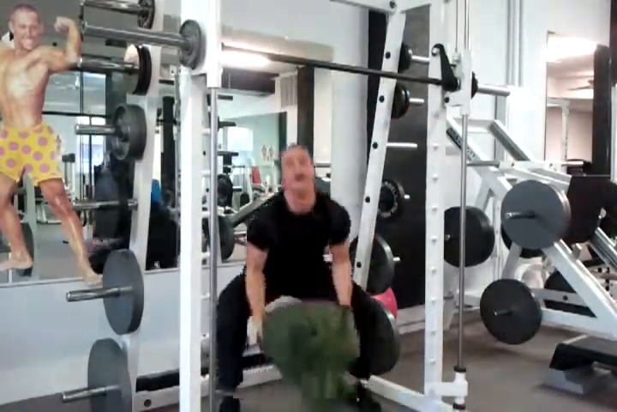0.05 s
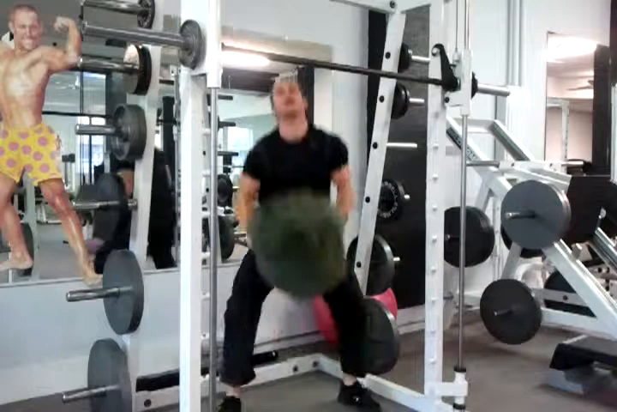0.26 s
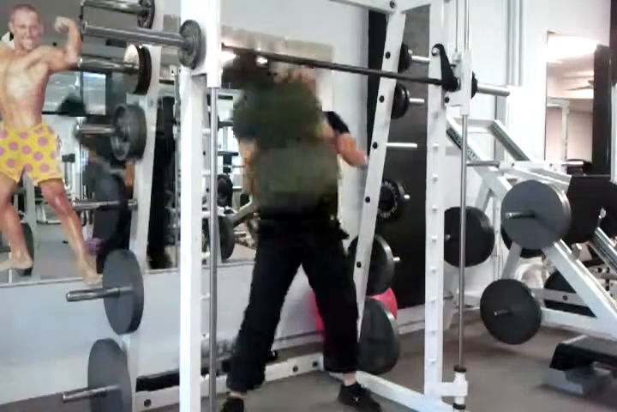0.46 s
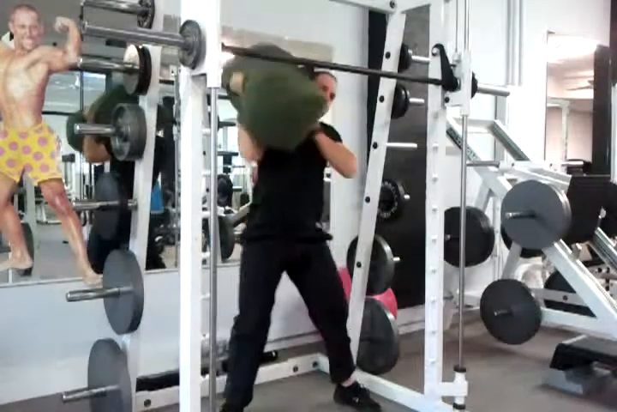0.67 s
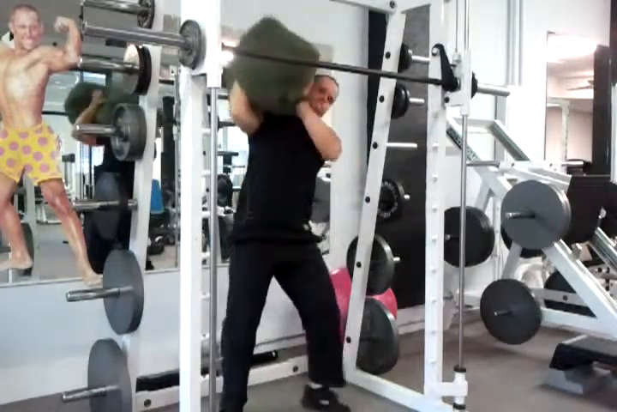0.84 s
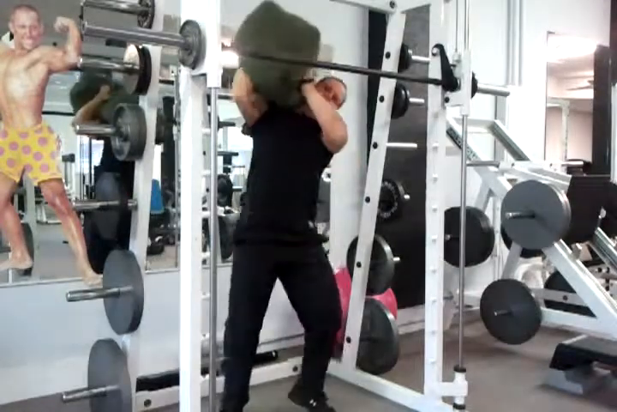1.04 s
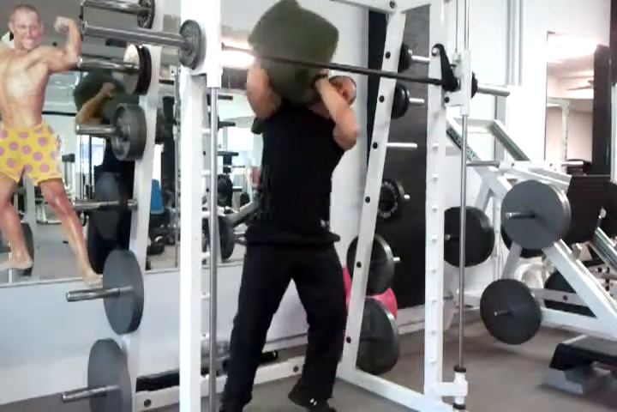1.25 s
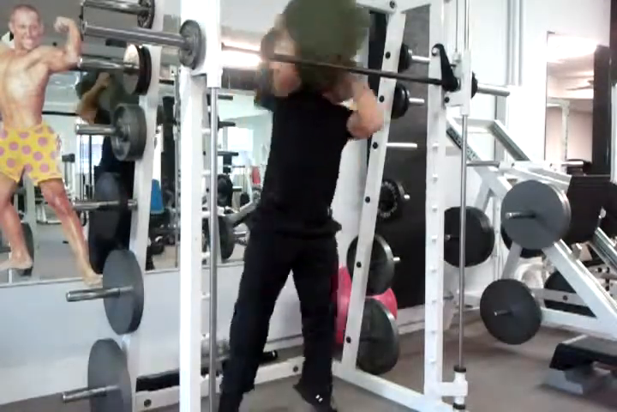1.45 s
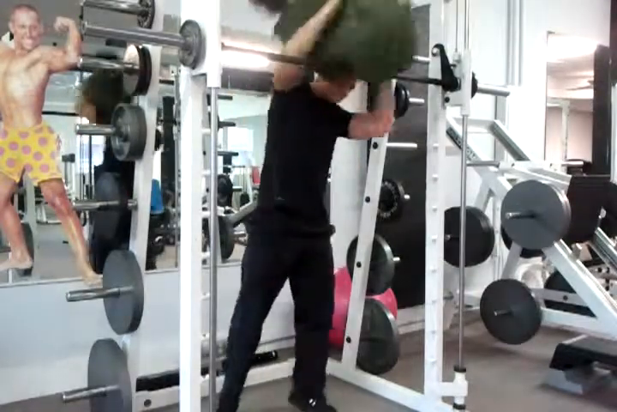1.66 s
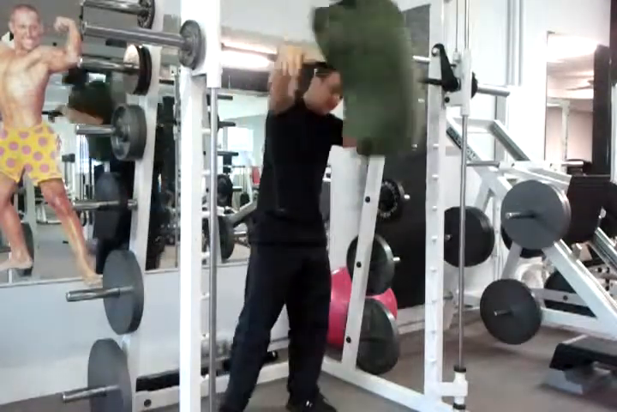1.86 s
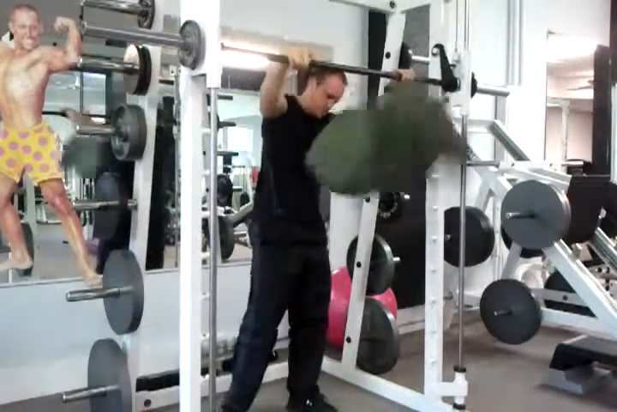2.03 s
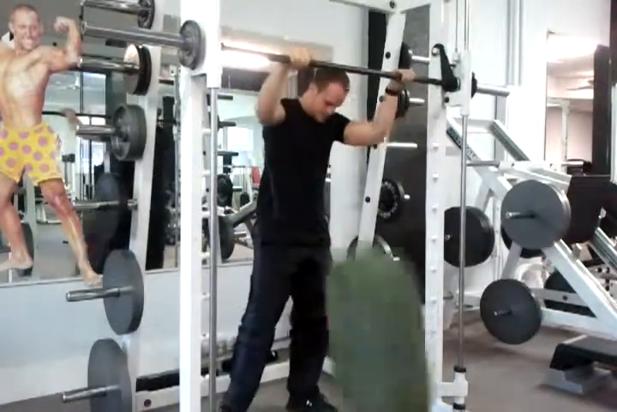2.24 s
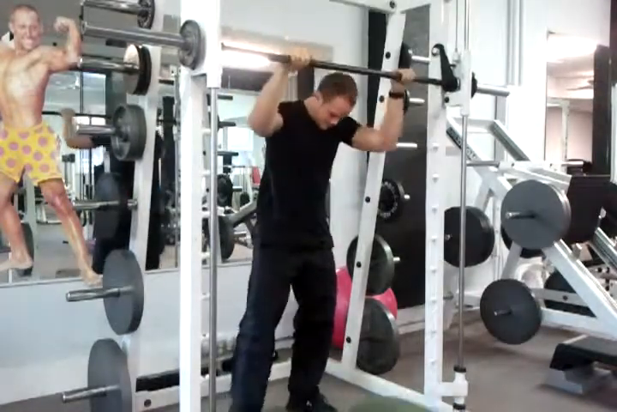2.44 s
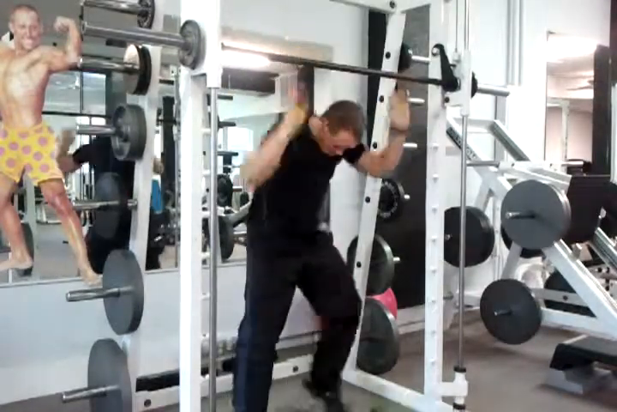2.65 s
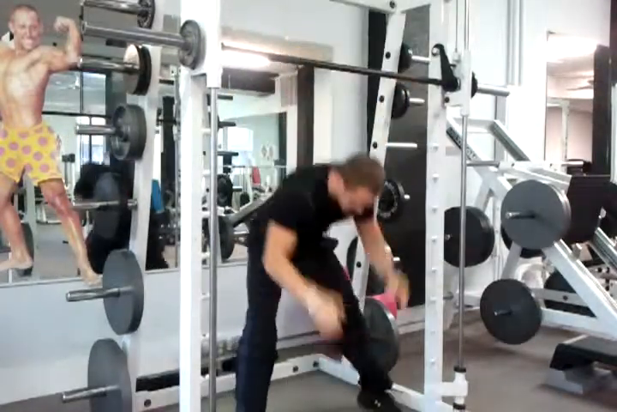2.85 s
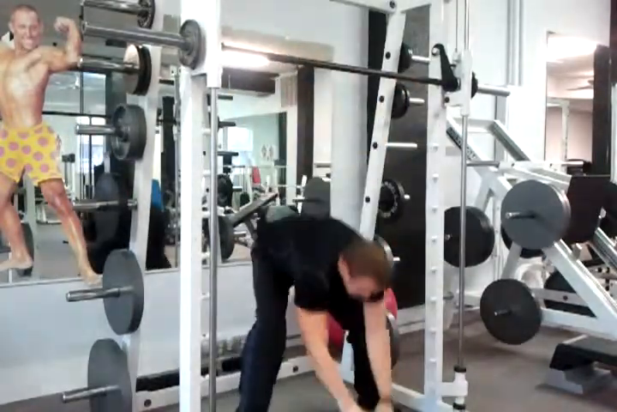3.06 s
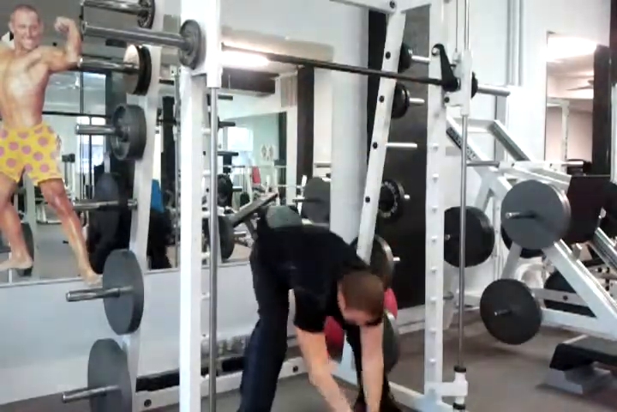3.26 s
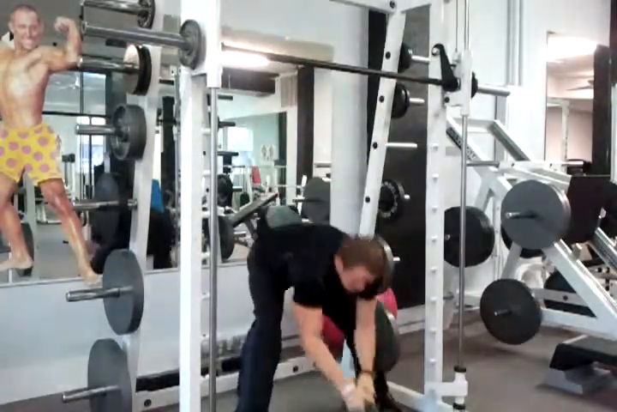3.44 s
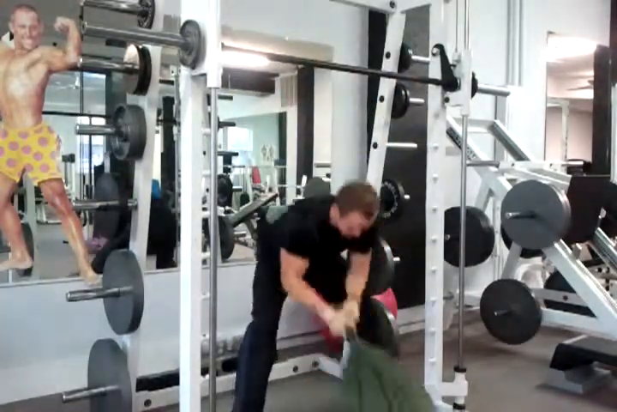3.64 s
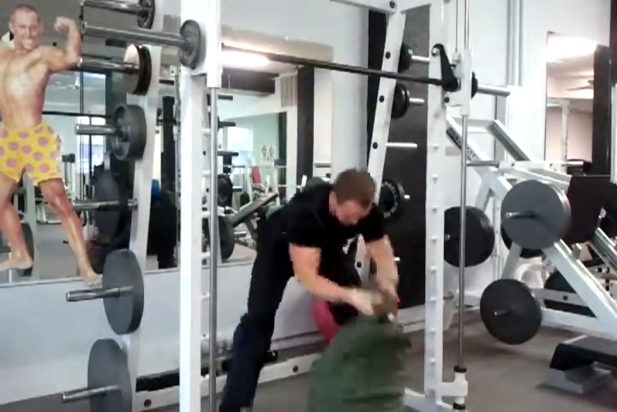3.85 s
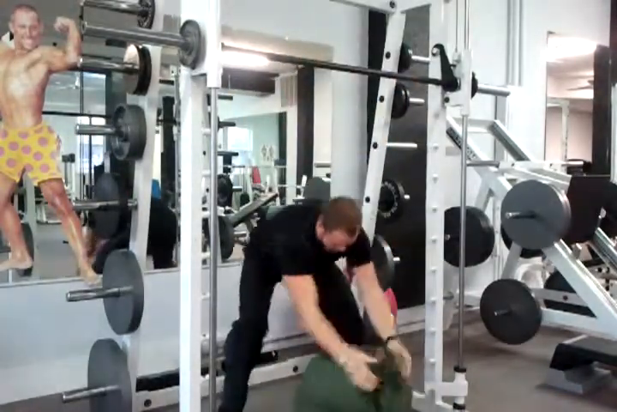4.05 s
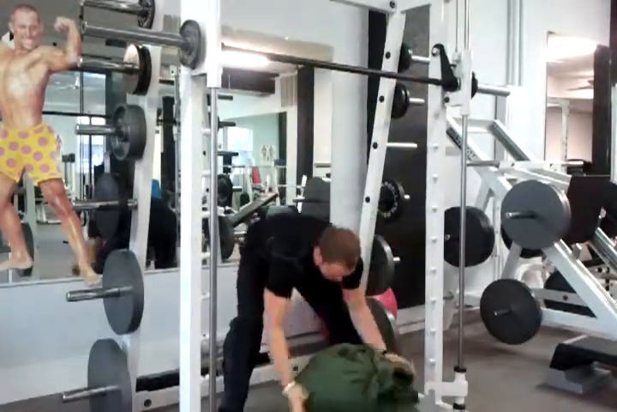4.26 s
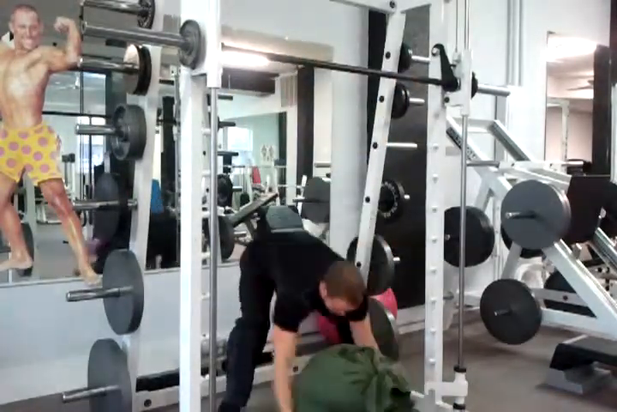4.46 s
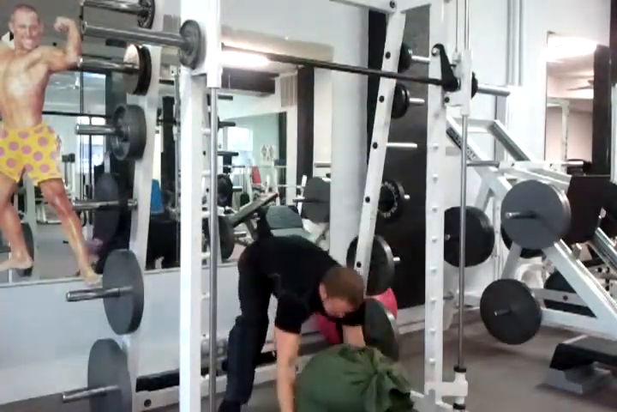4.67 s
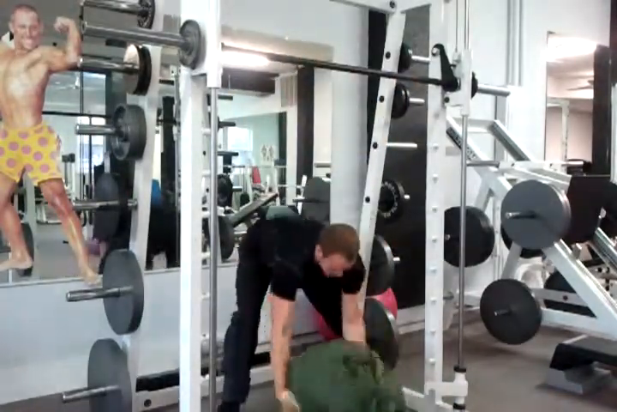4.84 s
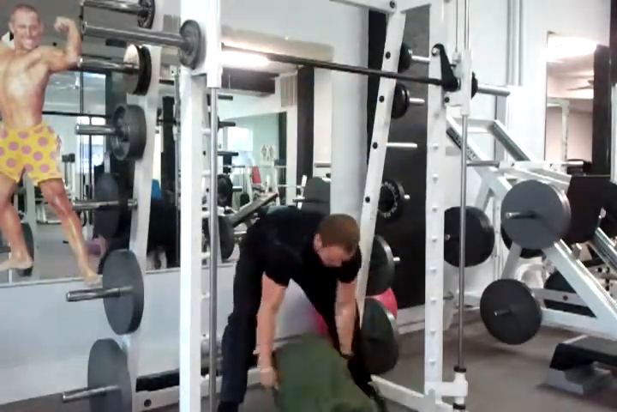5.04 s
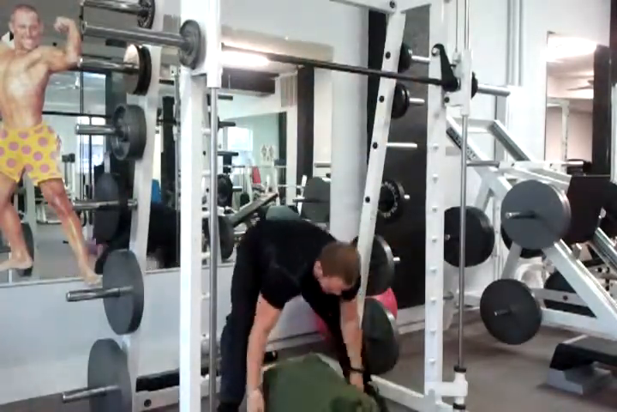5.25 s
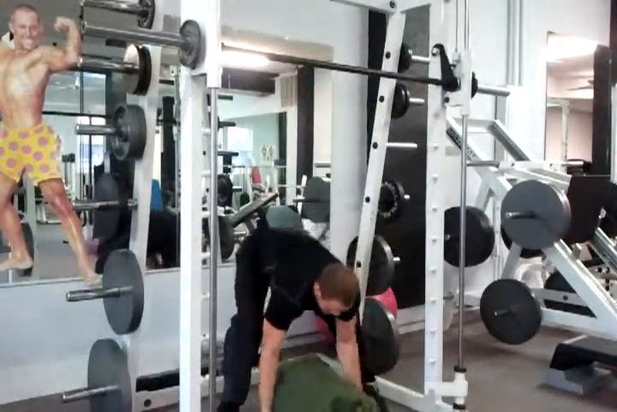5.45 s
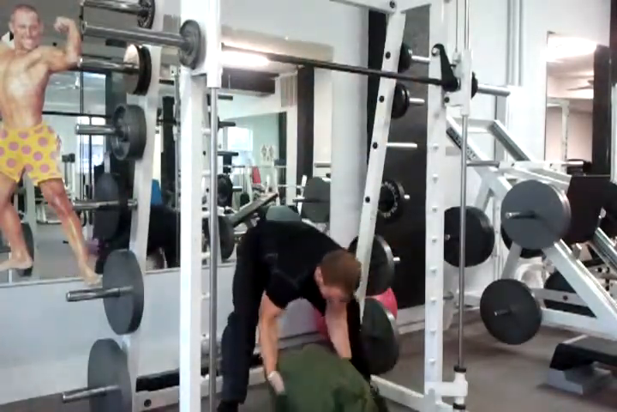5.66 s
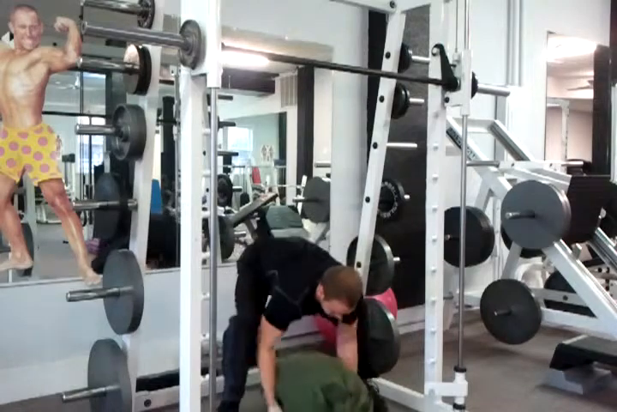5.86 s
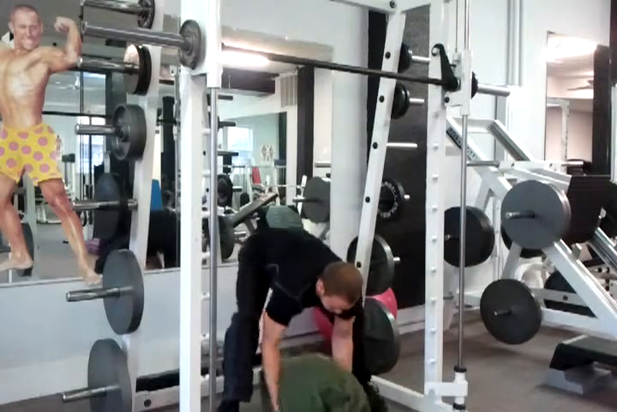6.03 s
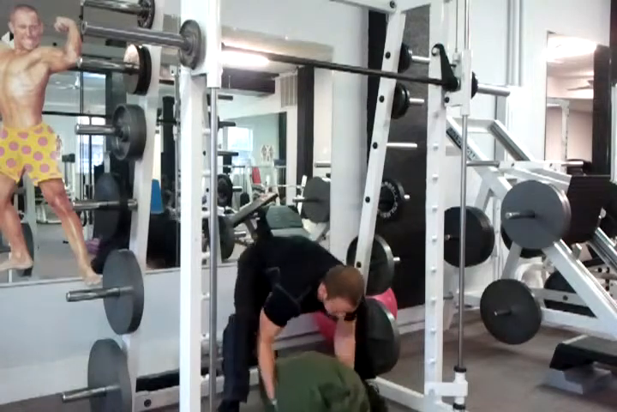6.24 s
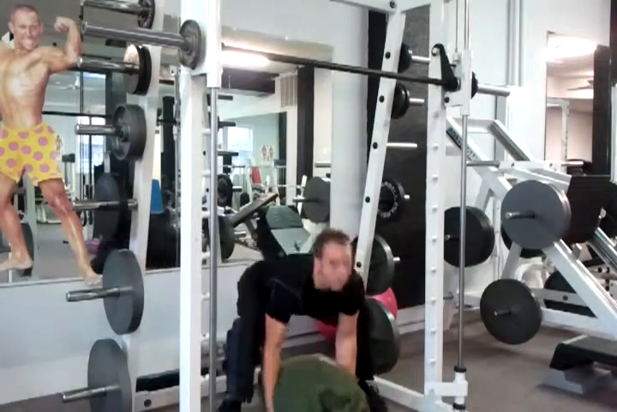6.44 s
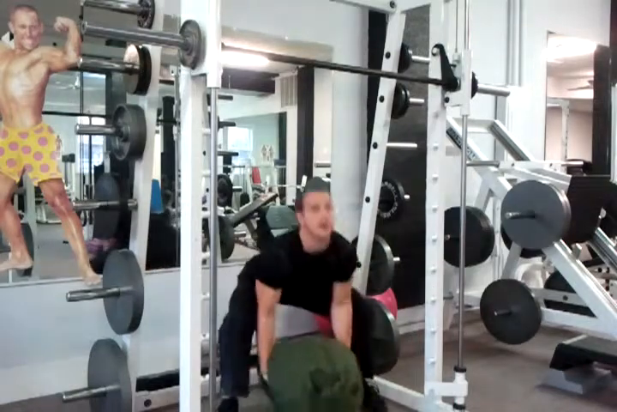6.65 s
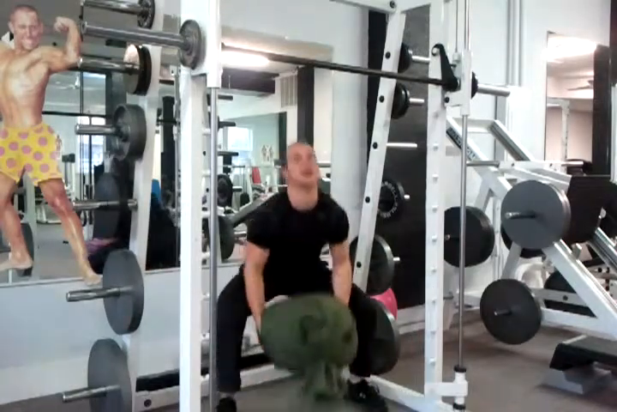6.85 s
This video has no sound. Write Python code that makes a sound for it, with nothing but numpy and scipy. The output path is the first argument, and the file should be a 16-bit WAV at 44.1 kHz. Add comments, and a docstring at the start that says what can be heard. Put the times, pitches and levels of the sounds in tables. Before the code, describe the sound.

Soft fabric rustle and a light thud in an echoing gym, then a sharp overloaded clank of a metal bar with a short ring. Half a second later a massive sandy thud overloads the microphone and its echo fades. Afterwards come quieter canvas scrapes, coarse sand scuffs and low bumps as the bag is dragged back and rolled, over faint room air.

```python
"""Canvas rasps and a soft thud: a sandbag is shouldered in a hard-walled gym and heaved over a steel bar.
The bar clanks in its rack; the bag crashes to the floor, is dragged back, tipped over and gripped again.
Blows and strokes are envelopes on coloured noise and grains; the bar rings as a sum of sine modes.
A small mono microphone with an 8 kHz band overloads on the two big blows."""
import sys
import numpy as np
from scipy import signal
from scipy.fft import rfft, irfft, next_fast_len
from scipy.io import wavfile

SR = 44100
rng = np.random.default_rng(int(sys.argv[2]) if len(sys.argv) > 2 else 0)


def put_to_file(sound):
    """Save the sound as 16-bit audio at rate SR, in the file named by the first command-line argument."""
    columns = np.atleast_2d(sound).T  # one column per channel
    safe = np.clip(columns, -1, 1)
    whole_steps = np.round(safe * 32767)
    wavfile.write(sys.argv[1], SR, whole_steps.astype(np.int16))


N = 304289
TIME_S = np.arange(N) / SR
BAND_HZ, CUTOFF_HZ = 8050, 15800  # microphone band, final low-pass

# blows of the bag; near 2.4 s one end touches down, the full weight lands, then the bag flops over
# [start/s, swell/s, sand level/dB, floor boom level/dB]
BAG_BLOWS = [(0.038, 0.0042, -30.5, -29), (0.866, 0.021, -29, -40), (1.812, 0.01, -22.5, -22.5),
             (1.908, 0.019, -17.5, -33.5), (2.089, .02, -26, -28), (2.395, 0.009, -14, -33),
             (2.4267, 0.00092, -4, -3.5), (2.434, 0.014, -6, -6), (2.472, 0.018, -6.5, -22),
             (2.726, 0.0073, -16, -30.5), (3.663, 0.0079, -25, -42), (4.176, 0.016, -22.5, -33),
             (4.753, 0.0027, -32, -33.5), (5.13, 0.022, -17.5, -27.5), (5.78, 0.019, -34.5, -27.5),
             (6.074, 0.017, -21.5, -25), (6.48, 0.02, -36, -36)]
# floor boom spectrum [f/Hz, density/dB]
BOOM_SPECTRUM = [(25, -50), (50, -25), (90, -7), (150, 1.5), (290, 3), (450, -6), (1000, -23)]
# sand crunch spectrum [f/Hz, density/dB]
SAND_SPECTRUM = [(40, -37), (100, -12.5), (200, -16.5), (290, 0.5), (420, 2.5), (750, 3.5), (1200, -0.5),
                 (1800, -7.5), (2500, -17.5), (4000, -18), (7900, -28.5)]
# canvas slap spectrum [f/Hz, density/dB]
SLAP_SPECTRUM = [(300, -36.5), (1000, 8.5), (2200, 12.5), (3500, 7), (5500, 2.5), (7500, 5.5)]
USUAL_BLOW_DB, USUAL_SWELL_S = -20, 0.015
SETTLE_S, SETTLE_POWER, SETTLE_DOUBLES_DB = 0.035, 1, 20  # usual fade; exponent on swell; dB to double it
SLAP_DB, SLAP_DB_PER_DB = -28, 1.43  # slap of a usual blow; growth with blow strength
BOOM_SETTLE_SHARE = 0.87  # the floor is still sooner than the sand


def thuds():
    """Each blow booms the floor, crunches sand and slaps canvas; slow or heavy blows settle longer."""
    starts_s, swells_s, sand_db, boom_db = np.transpose(BAG_BLOWS)
    hardness_db = sand_db - USUAL_BLOW_DB
    slap_db = SLAP_DB + SLAP_DB_PER_DB * hardness_db
    swell_factor = (swells_s / USUAL_SWELL_S) ** SETTLE_POWER
    fades_s = SETTLE_S * swell_factor * 2 ** (hardness_db / SETTLE_DOUBLES_DB)

    bag_forces = [blow(*row) for row in zip(starts_s, swells_s, fades_s)]
    floor_forces = [blow(*row) for row in zip(starts_s, swells_s, BOOM_SETTLE_SHARE * fades_s)]
    sand_level = together(sand_db, bag_forces)
    slap_level = together(slap_db, bag_forces)
    boom_level = together(boom_db, floor_forces)

    def boom():
        return boom_level * coloured(rng.standard_normal(N), BOOM_SPECTRUM)

    def sand():
        return sand_level * coloured(grains(per_s=1200, spread_db=3.0), SAND_SPECTRUM)

    slap = slap_level * coloured(grains(per_s=3800, spread_db=3.0), SLAP_SPECTRUM)
    return from_spots(boom, wet=0.51) + from_spots(sand, wet=0.51) + in_gym(slap, wet=0.17)


# the bar knocks against its hooks [start/s, clash level/dB, fade/s]
BAR_KNOCKS = [(1.8101, 5, 0.02), (1.83, -17, 0.025)]
# steel clash spectrum [f/Hz, density/dB]
CLASH_SPECTRUM = [(300, -28), (900, -15), (1500, -13.5), (1880, 0), (2300, -6), (2750, -3.5), (3600, -4.5),
                  (4400, -6), (5300, -1.5), (6300, 1.5), (7900, -3)]


def clash():
    """Steel chatters on steel: a dense, bright noise burst."""
    force = sum(from_db(db) * blow(start_s, swell_s=0.0079, fade_s=fade_s)
                for start_s, db, fade_s in BAR_KNOCKS)
    return force * coloured(rng.standard_normal(N), CLASH_SPECTRUM)


# ringing modes of bar and rack [f/Hz, relative level/dB]
RING_MODES = [(1843, -14), (1885, -13), (1975, -27), (2061, -26), (2212, -31), (2360, -30), (2645, -26),
              (2702, -26), (3138, -29), (3321, -29), (3803, -27), (4915, -29), (5380, -29), (6128, -23),
              (6163, -22), (6514, -28), (7047, -29), (7321, -30)]
RING_T60_S, RING_GAIN_DB, RING_BUILD_S = 0.5, 0.3, 0.065


def bar_ring():
    """The chatter pumps up the modes of bar and rack; close pairs beat as they fade."""
    modes = 0
    for hz, db in RING_MODES:
        phase = rng.uniform(0, 2 * np.pi)
        modes = modes + from_db(db) * np.sin(2 * np.pi * hz * TIME_S + phase)
    first_knock_s = BAR_KNOCKS[0][0]
    envelope = blow(first_knock_s, RING_BUILD_S, RING_T60_S / np.log(1000))
    return from_db(RING_GAIN_DB) * modes * envelope


# strokes of the bag on clothes, bar and floor: lifted, swung to the chest, pushed onto the shoulder,
# shoved over the bar, falling, slumping, grabbed, dragged back, tipped over, rolled, gripped again
# [start/s, swell/s, hold/s, sand scuff level/dB, canvas rasp level/dB]
BAG_STROKES = [(0.0, 0.0017, 0.04, -32, -36), (0.066, 0.024, 0.19, -69, -36.5),
               (0.303, 0.076, 0.2, -40.5, -33), (0.641, 0.029, 0.15, -36, -38.5),
               (0.777, 0.1, 0.12, -37, -29), (1.025, 0.037, 0.2, -52, -35), (1.567, 0.3, 0.088, -26.5, -30),
               (2.028, 0.029, 0.3, -34, -52), (2.596, .05, 0.043, -21, -32),
               (2.715, 0.02, 0.013, -24, -28.5), (2.993, 0.053, 0.053, -69, -34.5),
               (3.15, .04, 0.18, -54, -43.5), (3.523, 0.088, 0.03, -28.5, -42),
               (3.595, 0.13, 0.36, -35, -29), (3.993, 0.089, 0.14, -30.5, -32),
               (4.237, 0.061, 0.03, -32, -26), (4.56, 0.034, 0.25, -63, -41),
               (4.765, 0.11, 0.073, -33.5, -36.5), (5.026, 0.11, 0.15, -28, -35.5),
               (5.647, 0.098, 0.15, -33, -41), (5.902, 0.084, 0.15, -35, -40.5),
               (6.415, 0.051, 0.034, -34, -43.5), (6.583, 0.093, 0.077, -34.5, -42),
               (6.807, 0.032, .04, -59, -39.5)]
# sand scuff spectrum [f/Hz, density/dB]
SCUFF_SPECTRUM = [(30, -33), (70, -27), (120, -3), (190, -1), (260, 1), (500, 4.5), (800, 5), (1200, 0),
                  (2000, -6.5), (4000, -18.5), (7900, -45)]
# canvas rasp spectrum [f/Hz, density/dB]
RASP_SPECTRUM = [(500, -26.5), (1200, -12), (2200, -10), (3200, -6), (4200, -5), (5300, -4.5), (6400, -3),
                 (7600, 1.5), (8000, -1.5)]
# loaded canvas spectrum [f/Hz, density/dB]
GRIND_SPECTRUM = [(500, -14), (1200, 2), (2200, 1), (3500, -3), (5000, -6.5), (7900, -17)]
SCUFF_FADE_S, RASP_FADE_S = 0.029, 0.072
GRIND_DB = -4  # re geometric mean of scuff and rasp


def handling():
    """Canvas threads slip in a fine rasp, sand scuffs coarsely, loaded canvas grinds between the two."""
    table = np.array(BAG_STROKES)
    timing, scuff_db, rasp_db = table[:, :3], table[:, 3], table[:, 4]
    scuff_level = together(scuff_db, [stroke(*row, SCUFF_FADE_S) for row in timing])
    rasp_level = together(rasp_db, [stroke(*row, RASP_FADE_S) for row in timing])
    grind_level = from_db(GRIND_DB) * np.sqrt(scuff_level * rasp_level)

    def scuff():
        return scuff_level * coloured(grains(per_s=600, spread_db=3.0), SCUFF_SPECTRUM)

    rasp = rasp_level * coloured(grains(per_s=3000, spread_db=-1.0), RASP_SPECTRUM)
    grind = grind_level * coloured(grains(per_s=3000, spread_db=0.5), GRIND_SPECTRUM)
    return from_spots(scuff, wet=0.54) + in_gym(rasp + grind, wet=0.23)


# canvas squeaks faintly against the bar [start/s, swell/s, hold/s, f/Hz, level/dB]
BAR_SQUEAKS = [(0.886, 0.055, .12, 6350, -36), (1.082, 0.071, .18, 3880, -46.5)]
SQUEAK_WIDTH_HZ = 200


def squeaks():
    """Uneven slips on the bar gather round one pitch: noise through a narrow resonance."""
    out = 0
    for start_s, swell_s, hold_s, hz, db in BAR_SQUEAKS:
        b, a = signal.iirpeak(hz, hz / SQUEAK_WIDTH_HZ, fs=SR)
        whistle = rms_one(signal.lfilter(b, a, rng.standard_normal(N)))
        out = out + from_db(db) * whistle * stroke(start_s, swell_s, hold_s, RASP_FADE_S)
    return out


# steady air spectrum [f/Hz, density/dB]
AIR_SPECTRUM = [(25, -21), (50, -17), (100, -6.5), (180, 2), (270, -3.5), (500, 1.5), (800, -2.5),
                (1300, -6.5), (2500, -12.5), (5400, -14), (7800, -9)]
AIR_DB = -40


def room_air():
    """Steady coloured noise of the room's air."""
    return from_db(AIR_DB) * coloured(rng.standard_normal(N), AIR_SPECTRUM)


# reverberation of the gym [f/Hz, T60/s]
REVERB_T60 = [(60, 0.15), (200, 0.83), (800, 0.8), (2500, 0.77), (7900, 0.45)]


def gym_tail(build_s):
    """Diffuse reflections, each band dying at its own rate; unit energy over the bands covered."""
    age_s, tail = TIME_S[:SR], 0
    edges_hz = np.geomspace(30, 9000, 10)
    for low, high in zip(edges_hz, edges_hz[1:]):
        band_filter = signal.butter(2, [low, high], "band", fs=SR, output="sos")
        band = signal.sosfilt(band_filter, rng.standard_normal(SR))
        t60_s = at_hz(REVERB_T60, np.sqrt(low * high))
        tail = tail + band * np.exp(-np.log(1000) * age_s / t60_s)
    tail = tail * (1 - np.exp(-age_s / build_s))
    return tail / np.sqrt(np.sum(tail ** 2) * SR / 2 / edges_hz[-1])


def in_gym(x, wet):
    """Share power between direct sound and room; each call draws its own reflections."""
    reverb = signal.fftconvolve(x, gym_tail(build_s=0.0078))[:N]
    return np.sqrt(1 - wet) * x + np.sqrt(wet) * reverb


def from_spots(source, wet, count=3):
    """A large body sounds from several spots at once, each with its own reflections."""
    return sum(in_gym(source(), wet) for _ in range(count)) / np.sqrt(count)


def blow(start_s, swell_s, fade_s):
    """Force of one contact: linear build-up, exponential decay."""
    age_s = np.maximum(TIME_S - start_s, 0)
    return np.minimum(age_s / swell_s, 1) * np.exp(-np.maximum(age_s - swell_s, 0) / fade_s)


def stroke(start_s, swell_s, hold_s, fade_s):
    """Speed of one slide: it gathers pace, keeps it, then comes to rest."""
    return blow_with_hold(np.maximum(TIME_S - start_s, 0), swell_s, hold_s, fade_s)


def blow_with_hold(age_s, swell_s, hold_s, fade_s):
    """Linear rise, plateau, exponential decay."""
    return np.minimum(age_s / swell_s, 1) * np.exp(-np.maximum(age_s - swell_s - hold_s, 0) / fade_s)


def together(levels_db, shapes):
    """Overlapping contacts add in power."""
    return np.sqrt(from_db(levels_db) ** 2 @ np.array(shapes) ** 2)


def grains(per_s, spread_db):
    """Tiny random slips of uneven size and either sign; rms 1."""
    sizes = from_db(spread_db * np.minimum(rng.exponential(1, N), 4))
    signs = rng.choice([-1, 1], N)
    happens = rng.random(N) < per_s / SR
    return rms_one(sizes * signs * happens)


def coloured(x, spectrum):
    """Impose a spectrum on a steady texture, inside the microphone's band; rms 1."""
    size = next_fast_len(N)
    hz = np.arange(size // 2 + 1) * SR / size
    gain = from_db(at_hz(spectrum, hz)) * (hz < BAND_HZ)
    return rms_one(irfft(rfft(x, size) * gain, size)[:N])


def at_hz(points, hz):
    """Interpolate a table on a log-frequency axis."""
    knots_hz, values = np.transpose(points)
    return np.interp(np.log(np.maximum(hz, 1)), np.log(knots_hz), values)


def from_db(db):
    """Decibels to gain."""
    return 10 ** (np.asarray(db) / 20)


def rms_one(x):
    """Scale to unit power."""
    return x / np.sqrt(np.mean(x ** 2) + 1e-20)


def low_pass(x, hz):
    """Very steep linear-phase low-pass."""
    taps = signal.firwin(601, hz, fs=SR, window=("kaiser", 9))
    return signal.fftconvolve(x, taps, "same")


def scene():
    """Bag, bar and the room's steady air reach a single microphone."""
    bag = thuds() + handling() + squeaks()
    bar = from_spots(clash, wet=0.49) + in_gym(bar_ring(), wet=0.025)
    return np.tile(bag + bar + room_air(), (2, 1))


def record(dry):
    """The input overloads and is band-limited; the overshoots hit full scale once more."""
    narrow = low_pass(np.clip(dry[0], -1, 1), BAND_HZ)
    out = low_pass(np.clip(narrow, -1, 1), CUTOFF_HZ)
    return np.tile(out, (2, 1))


dry = scene()
out = record(dry)
put_to_file(out)
```